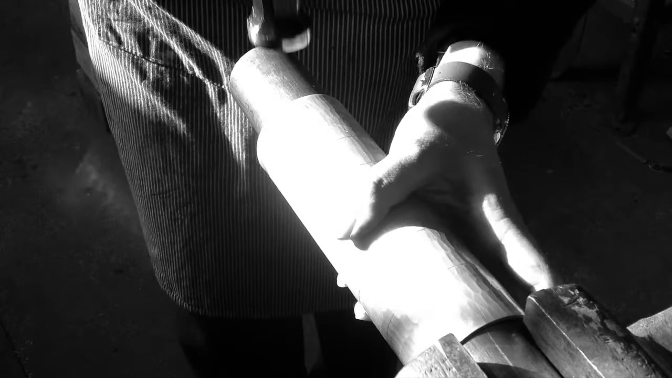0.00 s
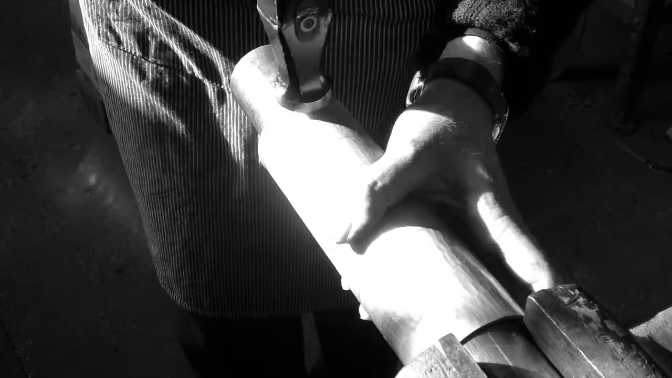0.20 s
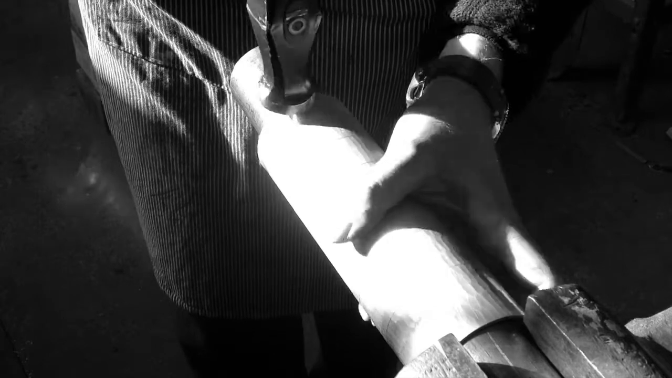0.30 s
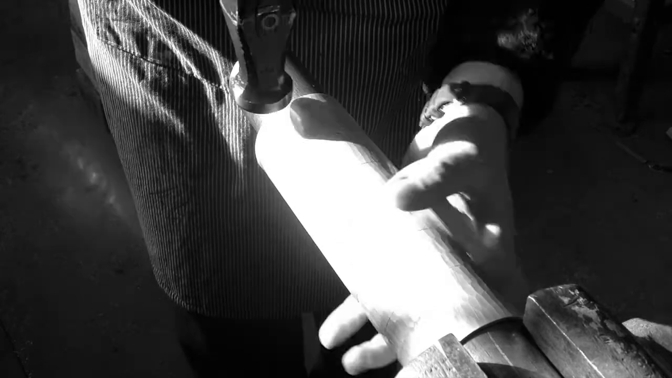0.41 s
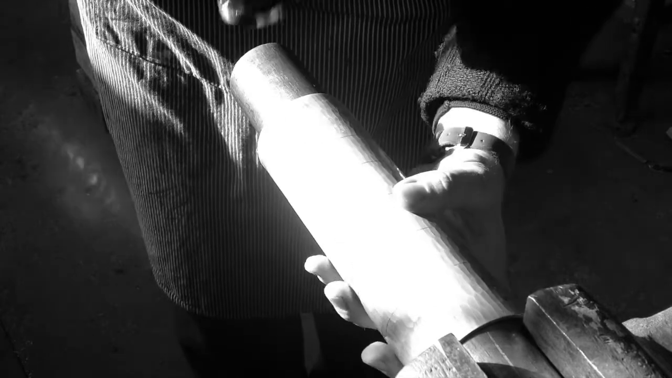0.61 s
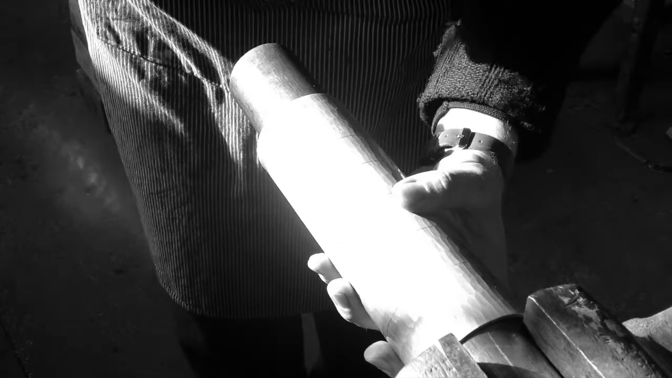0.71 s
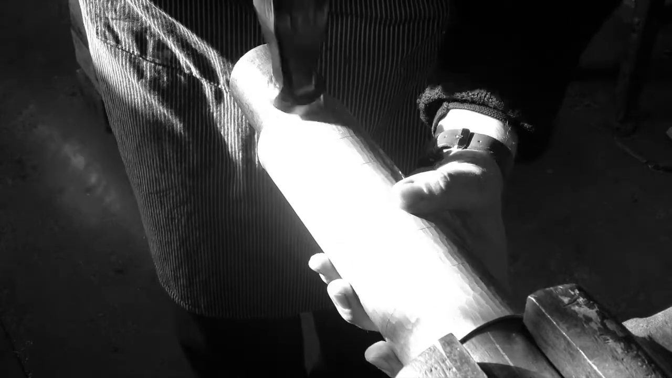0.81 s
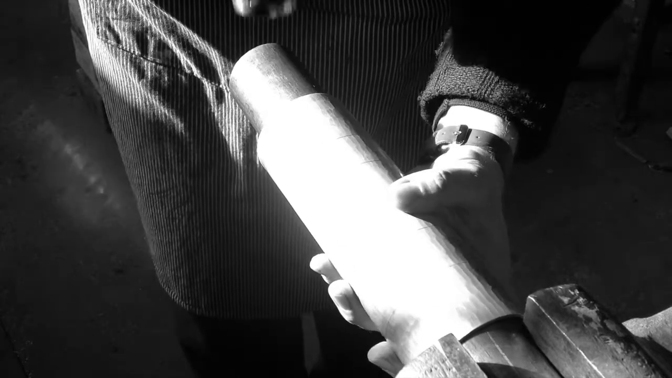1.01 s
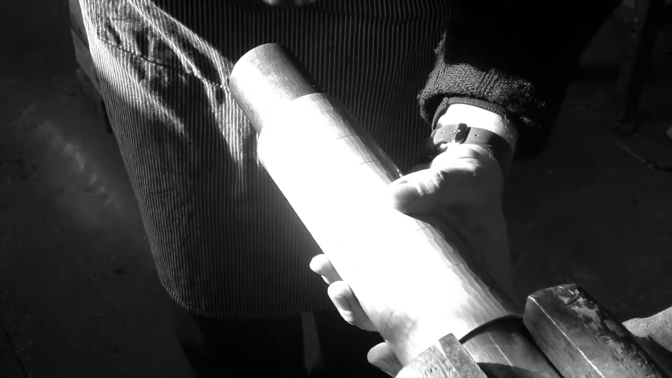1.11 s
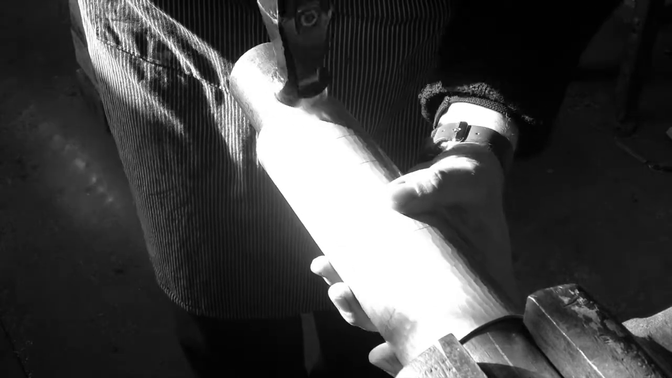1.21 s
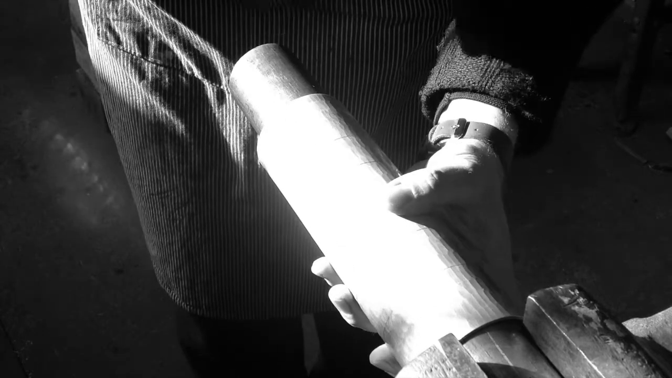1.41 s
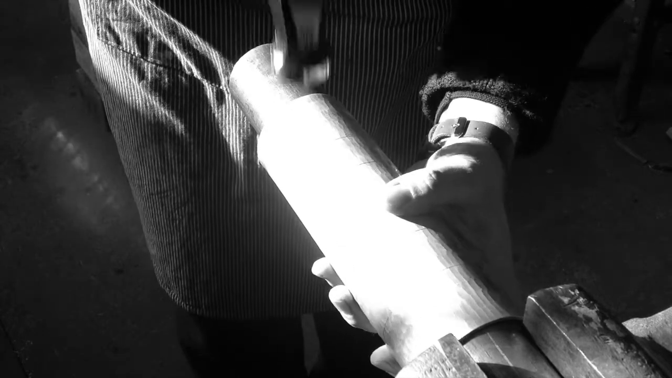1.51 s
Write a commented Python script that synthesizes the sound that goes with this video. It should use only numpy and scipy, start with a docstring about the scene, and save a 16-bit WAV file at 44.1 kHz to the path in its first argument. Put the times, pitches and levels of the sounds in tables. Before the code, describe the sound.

Three crisp metal hammer blows on hand-damped copper over steel, after the dying ring of a previous one; thin high ringing and a short room echo follow each, close microphone, faint dull room noise behind.

```python
"""Small workshop, close by: a hand hammer strikes the neck of a copper vase held over a steel stake.
Each blow is a crack of dense, hand-damped copper modes (banded noise) and a clang (decaying sines).
The steel rings on in thin, beating sine pairs; a low decaying sine thuds through the stake.
The room answers each blow by convolution with decaying noise and a low boom, over faint shaped noise.
An earlier blow is still dying away at the start."""
import sys
import numpy as np
from scipy import signal
from scipy.fft import rfft, irfft
from scipy.io import wavfile
from scipy.ndimage import uniform_filter1d

SR = 44100
rng = np.random.default_rng(int(sys.argv[2]) if len(sys.argv) > 2 else 0)


def wav_out(sig):
    """Save sig, one row per channel (or a flat mono array), as 16-bit PCM at SR to the path in sys.argv[1]."""
    wavfile.write(sys.argv[1], SR, np.round(np.clip(np.atleast_2d(sig).T, -1, 1) * 32767).astype(np.int16))


N = 68355
TIME_S = np.arange(N) / SR
FREQS_HZ = np.arange(N // 2 + 1) * SR / N + 1e-3  # offset keeps log(0) away
ATTACK_S = 0.00031


def undb(db):
    """Decibels to gain."""
    return 10 ** (np.asarray(db) / 20)


def along(points, hz):
    """Interpolate (f/Hz, value) points on a log-frequency axis."""
    point_hz, values = np.array(points, float).T
    return np.interp(np.log(hz), np.log(point_hz), values)


def fade(t60_s):
    """Exponential decay of 60 dB in t60_s."""
    return np.exp(-np.log(1000) * TIME_S / t60_s)


def rise(seconds):
    """Linear attack."""
    return np.minimum(TIME_S / seconds, 1)


def ring(hz, t60_s):
    """One decaying mode, caught at a random phase."""
    phase_turns = rng.random()
    return fade(t60_s) * np.sin(2 * np.pi * (hz * TIME_S + phase_turns))


def dense(colour, t60_points, count=30):
    """Countless overlapping modes: noise bands, each with its own strength and decay."""
    centres_hz = np.geomspace(40, 18000, count)
    noise = rfft(rng.standard_normal(N))
    out = 0
    for pick, centre_hz in zip(np.eye(count), centres_hz):
        band = np.interp(np.log(FREQS_HZ), np.log(centres_hz), pick)  # triangular on log f
        envelope = fade(along(t60_points, centre_hz))
        wave = irfft(noise * band, N) * envelope
        # remove the chance level of this noise draw
        expected_energy = np.mean(band ** 2) * np.sum(envelope ** 2)
        level_fix = np.sqrt(expected_energy / np.sum(wave ** 2))
        out = out + wave * level_fix * undb(along(colour, centre_hz))
    return out


# dense short modes of the wall: f/Hz, relative level/dB per Hz
CRACK_COLOUR = [(60, -35.5), (110, -16), (170, -1), (400, 4), (750, -2), (1000, -1.5), (1500, -2.5),
                (2500, 3), (3300, -4.5), (4500, 5), (6000, 0.5), (7400, -1), (8000, -3), (8700, 2),
                (10700, -5.5), (11800, -2), (13000, -9), (14800, -3.5), (15600, -24)]
# decay of those modes: f/Hz, t60/s
CRACK_DECAY = [(150, .11), (1000, 0.081), (5000, 0.1), (14000, 0.06)]
# distinct modes of the copper wall pressed on the stake: f/Hz, relative level/dB, t60/s
COPPER_MODES = [(221, -40.5, 0.35), (417, -41, 0.14), (707.7, -31.5, 0.08), (759.4, -33.5, 0.13),
                (1352, -28, 0.11), (1958, -36.5, .1), (2347, -26, .08), (2636, -40, 0.17),
                (3821, -36.5, 0.17), (3996, -27.5, 0.19), (4425, -29.5, .09), (4628, -46, .12),
                (4990, -16, .05), (5160, -34, 0.033), (5430, -33, .1), (6100, -23, 0.03),
                (7380, -38.5, 0.31), (7614, -26.5, .12), (10020, -30.5, 0.06)]
CRACK_DB = -16.5  # relative


def copper():
    """Struck wall: dense modes crack, distinct modes clang, both briefly."""
    crack = undb(CRACK_DB) * dense(CRACK_COLOUR, CRACK_DECAY)
    clang = sum(undb(db) * ring(hz, t60_s) for hz, db, t60_s in COPPER_MODES)
    return np.array([crack, clang]) * rise(ATTACK_S)


# centres of bass, body, clang and top colour: f/Hz
COLOUR_CENTRES_HZ = [110, 300, 2800, 12000]


def tint(x, colour_db):
    """Causal, minimum-phase tone colour set by where and how firmly the hammer lands."""
    colour = list(zip(COLOUR_CENTRES_HZ, colour_db))
    log_gain = np.log(undb(along(colour, FREQS_HZ)))
    cepstrum = irfft(log_gain, N)
    # fold onto positive time
    cepstrum[1:N // 2] *= 2
    cepstrum[N // 2:] = 0
    return irfft(rfft(x) * np.exp(rfft(cepstrum)), N)


SWELL_DB, SWELLS_PER_S = 4, 22  # dB std of the steps before smoothing; step rate


def swell():
    """Irregular swells and dips of a ringing tone: smoothed random steps; mean power 1."""
    hold = int(SR / SWELLS_PER_S)
    steps = np.repeat(rng.standard_normal(N // hold + 1), hold)
    gain = undb(SWELL_DB * uniform_filter1d(steps, hold)[:N])
    return gain / np.sqrt(np.mean(gain ** 2))


# modes of steel stake and hammer head: f/Hz, relative level/dB, base t60/s, beat/Hz
STEEL_MODES = [(2324, -44, 0.44, 35), (4000, -39, 0.44, 13), (6199, -35, 0.31, 16), (7553, -43, 0.53, 5),
               (9540, -52.5, 0.38, 4.7), (10980, -60.5, 0.73, 1.2), (11630, -44, 0.64, 4.5)]
DETUNE_STD_HZ = 2  # scatter from blow to blow
HIGH_STEEL_HZ = 7000  # length factor acts above this


def steel(high_length_factor):
    """Long, thin modes that waver and beat, each with an equally strong, slightly higher twin."""
    out = 0
    for hz, db, t60_s, beat_hz in STEEL_MODES:
        pitch_hz = hz + DETUNE_STD_HZ * rng.standard_normal()
        mode_t60_s = t60_s * (high_length_factor if hz > HIGH_STEEL_HZ else 1)
        waver = swell()
        pair = ring(pitch_hz, mode_t60_s) + ring(pitch_hz + beat_hz, mode_t60_s)
        out = out + undb(db) * waver * pair
    return out * rise(ATTACK_S)


THUD_HZ, THUD_DB, THUD_T60_S = 151.2, -27.5, 0.069  # relative dB


def thud():
    """The push of the hammer thuds through the stake: one low, short-lived mode."""
    return undb(THUD_DB) * fade(THUD_T60_S) * np.sin(2 * np.pi * THUD_HZ * TIME_S)


# diffuse reverberation: f/Hz, relative level/dB
ROOM_COLOUR = [(60, -29), (110, -11), (175, -13), (260, -6), (350, 1), (800, 1.5), (1500, -3), (3000, -4.5),
               (5000, -7.5), (8000, -3.5), (11000, -2.5), (15000, -9.5)]
# its decay: f/Hz, t60/s
ROOM_DECAY = [(100, 0.18), (180, 1), (400, 0.47), (1200, 0.56), (3000, .48), (6000, .4), (10000, 0.31),
              (15000, 0.24)]
# standing waves of the workshop: f/Hz, relative level/dB, t60/s
BOOM_MODES = [(160.9, -26, 0.6), (201, -22, 0.68)]
ROOM_DELAY_S, ROOM_BUILD_S = 0.0044, 0.0042


def workshop(x):
    """Diffuse reflections, delayed and quick to build, with frequency-dependent decay and low boom."""
    boom = sum(undb(db) * ring(hz, t60_s) for hz, db, t60_s in BOOM_MODES)
    build = np.clip((TIME_S - ROOM_DELAY_S) / ROOM_BUILD_S, 0, 1)
    response = (dense(ROOM_COLOUR, ROOM_DECAY) + boom) * build
    reference = np.sqrt(np.sum(fade(0.49) ** 2))  # root energy of a 0.49 s decay
    return signal.fftconvolve(x, response / reference)[:len(x)]


# background spectrum shape: f/Hz, relative level/dB per Hz
AIR_COLOUR = [(30, -24), (80, -14.5), (130, -4), (200, -2), (400, 1.5), (1000, -3.5), (2500, -11.5),
              (5000, -20.5), (10000, -20), (15000, -29.5)]
AIR_RMS_DB = -67.5  # before the recorder


def background():
    """Faint, dull room noise: spectrally shaped white noise."""
    air = irfft(rfft(rng.standard_normal(N)) * undb(along(AIR_COLOUR, FREQS_HZ)), N)
    return undb(AIR_RMS_DB) * air / air.std()


# hammer blows: t/s, level/dB, thud level/dB, steel ring level/dB, t60 factor of the high steel modes,
# then copper colour: bass/dB, body/dB, clang/dB, top/dB
HAMMER_BLOWS = [(-.135, 5.5, -16, -1.5, 0.5, -3, -2, -1.5, 0.5),
                (0.2274, 0.5, -1.5, -1.5, 1.266, -2, 0.5, 1.5, 3),
                (0.8441, 0, -13, 0, 0.75, -4, 1, 0.5, 1.5),
                (1.2088, 0.5, -30, -2.5, 0.71, -6, -1.5, 1.5, 1)]
LEAD_S = 0.25  # room for the blow before t = 0
CLANG_ROOM_DB, STEEL_ROOM_DB, THUD_ROOM_DB = -5, 6, -14.5  # room sends relative to the crack's


def scene():
    """The blows, each reaching the room by new paths as the vase turns, over the background."""
    lead = int(LEAD_S * SR)
    out = np.zeros(lead + 2 * N)
    for start_s, db, thud_db, ring_db, high_length_factor, *colour_db in HAMMER_BLOWS:
        at = lead + int(start_s * SR)
        crack, clang = tint(copper(), colour_db)
        stake = undb(ring_db) * steel(high_length_factor)
        push = undb(thud_db) * thud()
        direct = crack + clang + stake + push
        sent = crack + undb(CLANG_ROOM_DB) * clang
        sent = sent + undb(STEEL_ROOM_DB) * stake + undb(THUD_ROOM_DB) * push
        out[at:at + N] += undb(db) * (direct + workshop(sent))
    return (out[lead:lead + N] + background())[None]


BASS_CUT_HZ, TOP_HZ = 85, 15200


def record(dry):
    """The recorder cuts the deep bass and the very top."""
    high_pass = signal.butter(2, BASS_CUT_HZ, "high", fs=SR, output="sos")
    low_pass = signal.ellip(8, 0.2, 70, TOP_HZ, fs=SR, output="sos")
    return signal.sosfilt(low_pass, signal.sosfilt(high_pass, dry))


dry = scene()
out = record(dry)
wav_out(out)
```